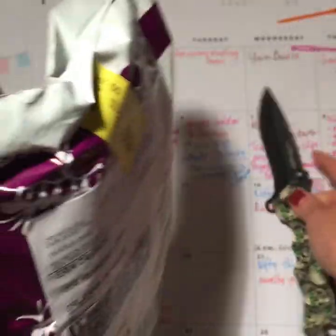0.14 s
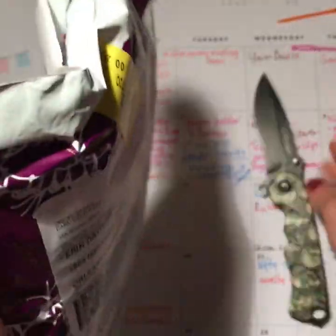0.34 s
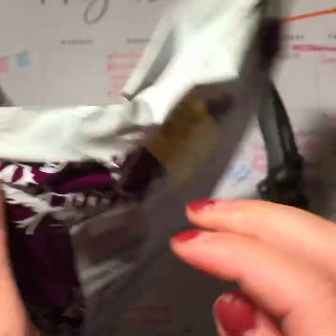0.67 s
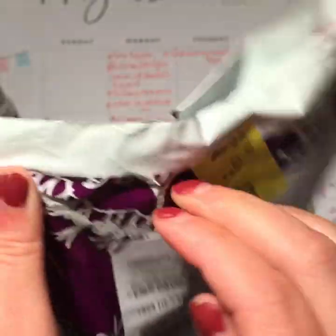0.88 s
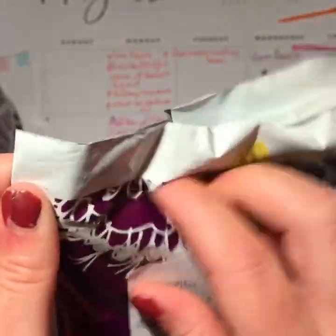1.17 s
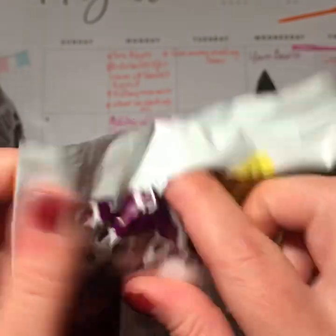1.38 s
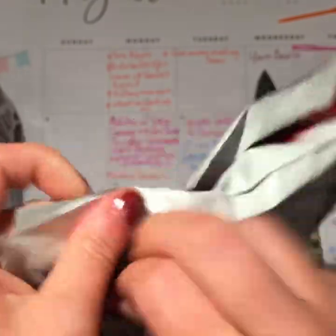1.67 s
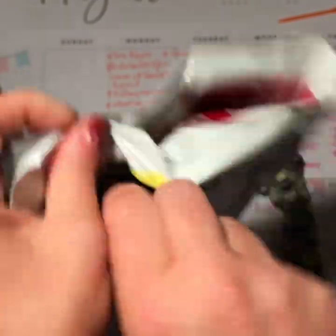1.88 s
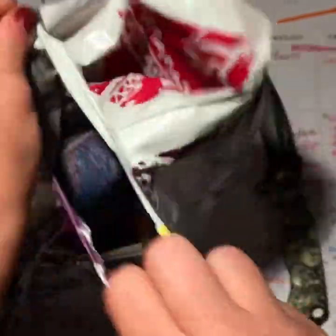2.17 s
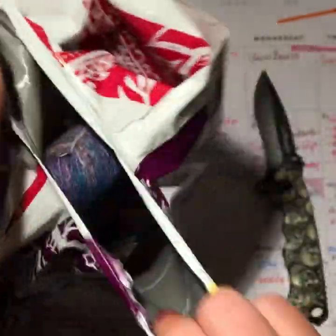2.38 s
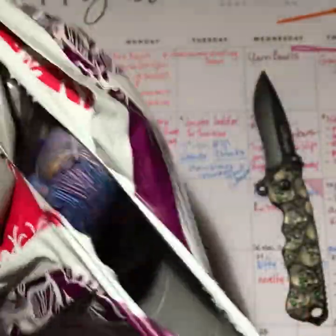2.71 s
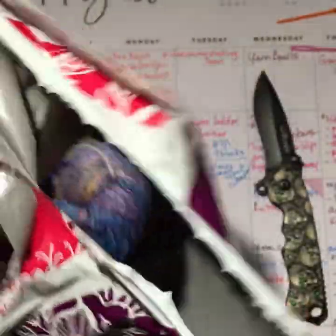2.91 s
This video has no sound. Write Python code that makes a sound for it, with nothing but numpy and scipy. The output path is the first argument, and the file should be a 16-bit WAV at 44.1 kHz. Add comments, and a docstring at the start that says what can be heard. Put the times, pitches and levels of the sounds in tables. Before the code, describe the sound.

Crisp plastic film crackles ever louder as hands open a package, following a knife set down

```python
"""A knife goes down on a table: dull thumps ring the wood's low modes, noise bursts give the handle's clack.
Two hands then crinkle a plastic mailer and pull it open: creases snap as short, smeared rings, pieces of
the sheet flap as hollow noise taps, and slack-drum pops are sagging sines. Swarms of tiny crackles and
flaps and the hiss of sliding film follow the pull of the hands.
Throughout, a small room answers faintly over low hum and a rush of air; the microphone is close."""
import sys
import numpy as np
from scipy import signal
from scipy.fft import rfft, irfft
from scipy.io import wavfile

SR = 44100
rng = np.random.default_rng(int(sys.argv[2]) if len(sys.argv) > 2 else 0)


def digitize_waveform(pressure):
    """Quantize a signal to 16-bit integers and store it at the path in sys.argv[1].

    Rows of a 2-D input are taken as channels; values are limited to [-1, 1].
    """
    field = np.atleast_2d(pressure).T
    bounded = np.clip(field, -1, 1)
    quanta = np.round(bounded * 32767).astype(np.int16)
    wavfile.write(sys.argv[1], SR, quanta)


N = 134505  # length [samples]


def amp(db):
    """Turns decibels into gain."""
    return 10 ** (np.asarray(db) / 20)


def unit(x):
    """Scales a sound to energy 1."""
    return x / np.sqrt(np.sum(x ** 2) + 1e-20)


def evened(x):
    """Scales a sound to rms 1."""
    return unit(x) * np.sqrt(len(x))


def read(points, hz):
    """Reads a curve between its points on a log-frequency axis."""
    f, value = np.transpose(points)
    return np.interp(np.log(hz + 1), np.log(f + 1), value)


def add(mix, s, sound):
    """Mixes a sound in at time s."""
    start = max(round(s * SR), 0)
    part = mix[start:][:len(sound)]
    part += sound[:len(part)]


def bins(size=2048):
    """Frequencies of a short spectrum [Hz]."""
    return np.fft.rfftfreq(size, 1 / SR)


def click(db):
    """The sharpest causal click with this spectrum: minimum phase, energy 1."""
    both_sides_db = np.r_[db, db[-2:0:-1]]
    log_gain = np.log(amp(both_sides_db))
    spectrum = np.exp(np.conj(signal.hilbert(log_gain)))
    return unit(np.fft.ifft(spectrum).real[:len(db)])


def burst(decay_s, size=1500):
    """A puff of noise that dies away, energy 1."""
    fade = np.exp(-np.arange(size) / SR / decay_s)
    return unit(rng.standard_normal(size) * fade)


def noise(points):
    """Steady noise of a given spectrum, rms 1."""
    white = rfft(rng.standard_normal(N))
    return evened(irfft(white * amp(read(points, bins(N))), N))


def swarm(grains, per_s, spread_db):
    """Scatters grains at random times, signs and sizes, rms 1."""
    out = np.zeros(N)
    for grain in grains:
        sign = rng.choice([-1, 1], N)
        boost_db = spread_db * np.minimum(rng.exponential(1, N), 3.2)
        struck = rng.random(N) < per_s / len(grains) / SR
        out += signal.oaconvolve(sign * amp(boost_db) * struck, grain)[:N]
    return evened(out)


# colour of the film in every snap and crackle: (frequency [Hz], level [dB])
FILM_COLOUR = [(150, -18), (500, -9.5), (1500, 7.5), (3000, 6), (6000, 5), (11000, 3.5), (16000, -8.5)]
RATTLE, RATTLE_S = .6, 0.0024  # gain and decay of the film's rattle after a snap
SHIVER, SHIVER_S = 0.43, 0.0031  # gain and decay of the shiver that follows on
SNAP_SKIRT = 1.5  # steepness of the slopes either side of a snap's pitch
BEND_S, BEND_HZ = 0.00044, 4740  # bending waves' travel time at this pitch; low notes come later


def snap(hz, octaves, skirt=SNAP_SKIRT):
    """A crease flips: one short ring spreads through the film, which rattles after it."""
    f = bins() + 1
    away = np.log2(f / hz) / octaves
    ring = click(read(FILM_COLOUR, f) - 10 * skirt * np.log10(1 + away ** 2))
    late = np.exp(-4j * np.pi * BEND_S * np.sqrt(f * BEND_HZ))
    ring = irfft(rfft(ring, 2 * len(f) - 2) * late)[:len(f)]
    drive = RATTLE * burst(RATTLE_S) + SHIVER * burst(SHIVER_S)
    drive[0] += 1  # the flip itself
    return unit(signal.fftconvolve(drive, ring))


# colour of a jerking piece of sheet: (frequency [Hz], level [dB])
SHEET_COLOUR = [(100, -16), (300, -4), (480, -15), (900, -4), (2300, -20), (5000, -28), (16000, -100)]
FLAP_S, FLAP_OCTAVES = 0.0041, 1  # decay of the jerk; width of its pitch peak


def flap(hz):
    """A wider piece of the sheet jerks with a hollow tap of its own pitch."""
    away = np.log2((bins() + 1) / hz) / FLAP_OCTAVES
    tap = click(read(SHEET_COLOUR, bins()) - 10 * np.log10(1 + away ** 2))
    return unit(signal.fftconvolve(burst(FLAP_S), tap))


# creases that buckle: (time [s], energy before SNAP_DB [dB], pitch [Hz], bandwidth [octaves])
CREASE_SNAPS = [(.63, -21, 2220, 0.63), (0.7042, -23.5, 2400, 0.57), (.8093, -25.5, 2900, 0.23),
                (0.9771, -23.5, 4300, 0.21), (.989, -11.5, 6560, 1.1), (1.0116, -14, 6450, 0.19),
                (1.052, -7, 5670, 1.8), (1.071, -14, 4530, 0.54), (1.0768, -13.5, 3500, 0.9),
                (1.1153, -7, 2770, 0.99), (1.1266, -6, 2640, 1.3), (1.22, -11.5, 4900, 4.2),
                (1.3697, -13.5, 5070, 0.62), (1.458, -13, 3920, 0.72), (1.5923, -4, 4600, 0.66),
                (1.6139, -2.5, 4800, 0.67), (1.6585, -7, 3900, 0.46), (1.6857, -8, 5200, .66),
                (1.699, -7.5, 6600, 0.31), (1.7224, -10.5, 3160, 0.14), (1.73, 1.5, 7250, 0.39),
                (1.7782, -4.5, 6640, .28), (1.8152, -1, 5740, 0.097), (1.8374, -7, 5500, 0.55),
                (1.852, -2, 5100, 1.2), (1.885, -11, 8060, 0.5), (1.8907, -0.5, 11900, 2.2),
                (1.9029, -5, 3180, 0.47), (1.9763, -8, 4450, .5), (2.0114, -6.5, 4220, 1),
                (2.0539, -1.5, 6600, 0.43), (2.078, -2.5, 5360, 2.1), (2.108, -2, 5470, 0.98),
                (2.1295, -4, 3300, .3), (2.1448, -2.5, 8300, 1.2), (2.1971, -1.5, 3960, 3.2),
                (2.2028, -2, 5600, 6.6), (2.212, -3, 5930, 1.1), (2.2324, -3, 5960, 0.71),
                (2.2374, 1.5, 3350, 1.5), (2.315, -3, 4700, 1.4), (2.3355, -7.5, 3060, .3),
                (2.3452, -6, 2650, 0.33), (2.358, 2, 3880, 1.8), (2.4148, 0, 3480, 1.4),
                (2.439, 1, 5430, 1.3), (2.4464, -11, 4200, 1.4), (2.471, -3.5, 4360, 2.6),
                (2.4794, -4, 5840, 3.8), (2.5148, 0, 3330, 0.75), (2.5372, -8, 3800, 1),
                (2.5988, -10.5, 3160, 1.6), (2.6255, -11.5, 4700, 0.43), (2.6391, -9, 2600, .4),
                (2.6847, -14, 3360, 0.64), (2.697, 5.5, 5630, 0.49), (2.7143, 2.5, 4480, 1.1),
                (2.718, 3.5, 9000, 2), (2.7739, -2, 3400, 2.3), (2.781, -4, 2900, 0.84),
                (2.834, -7, 5650, 0.36), (2.8491, -12, 5600, 1.6), (2.8707, -6.5, 6200, 1.2),
                (2.924, -5.5, 3200, 0.62)]
# jerks of the sheet: (time [s], energy before FLAP_DB [dB], pitch [Hz])
SHEET_FLAPS = [(.06, -25, 1010), (0.088, -21.5, 760), (.78, -17, 1030), (0.9622, -26, 1250),
               (0.9758, -11.5, 940), (1.323, -19, 1300), (1.686, -29, 1050), (1.84, -5, 980),
               (1.975, -4, 1000), (2.081, -4.5, 1380), (2.107, -3, 1110), (2.1564, -12, 1110),
               (2.232, -2, 1170), (2.36, -5, 1620), (2.4167, -12, 1580), (2.439, 2.5, 1120),
               (2.4803, -2, 1350), (2.4897, -24, 1350), (2.717, -4, 1100), (2.7743, -8.5, 1650),
               (2.833, -7, 1020), (2.8491, -7.5, 1280)]
# the taut bag pops like a slack drum: (time [s], energy [dB], middle pitch [Hz])
BAG_POPS = [(2.237, -14, 296), (2.359, -10, 290), (2.713, -12, 266), (2.776, -9, 346)]
SNAP_DB, FLAP_DB = -0.5, -4  # trims of all snaps and flaps
POP_DECAY_S, POP_SAG = 0.0042, 0.11  # fade of a pop; fall of its pitch as a share of it


def creases():
    """Loud snaps of buckling film, flaps of the sheet and hollow pops whose pitch sags as they fade."""
    out = np.zeros(N)
    for s, db, hz, octaves in CREASE_SNAPS:
        add(out, s - BEND_S, amp(db + SNAP_DB) * snap(hz, octaves))
    for s, db, hz in SHEET_FLAPS:
        add(out, s, amp(db + FLAP_DB) * flap(hz))
    fade = np.exp(-np.arange(SR // 10) / SR / POP_DECAY_S)
    for s, db, hz in BAG_POPS:
        sagging_hz = hz * (1 + POP_SAG * (fade - .5))
        pop = fade * np.sin(2 * np.pi * np.cumsum(sagging_hz) / SR)
        add(out, s, amp(db) * unit(pop))
    return out


# pull of the hands, from which each layer is trimmed: (time [s], level [dB])
HAND_PULL = [(0, -64.5), (.3, -63.5), (.56, -63), (.77, -54.5), (.87, -56.5), (.93, -81), (.965, -60.5),
             (1.08, -45), (1.19, -53), (1.48, -51.5), (1.528, -43.5), (1.63, -50.5), (1.732, -39.5),
             (1.8, -50.5), (1.92, -46.5), (1.98, -39), (2.039, -51), (2.09, -36), (2.22, -34),
             (2.27, -41.5), (2.35, -38), (2.57, -43), (2.8, -42), (3.05, -46)]
# colour of film sliding on film, here and in the rubs: (frequency [Hz], level [dB per Hz])
SLIDE_COLOUR = [(300, 4.5), (1200, -4), (6500, 2.5), (9000, 1), (16000, -14.5)]
CRACKLE_DB, SLIDE_DB, FLUTTER_DB = -0.5, -12, -3  # layer trims
CRACKLE_HZ, CRACKLE_SKIRT = (1430, 7700), 3  # pitch range; steepness of the slopes
CRACKLES_PER_S, CRACKLE_SPREAD_DB = 420, 6
FLAP_HZ = (630, 1660)  # each small flap of the flutter favours its own pitch in this range
FLAPS_PER_S, FLAP_SPREAD_DB = 200, 5
PULL_DB, FLUTTER_FOLLOW = -19, 0.97  # flutter moves 0.97 dB per dB of pull, pivoting at this level
AVALANCHE_DB, AVALANCHE_S = -35, 0.0059  # crackle swell around a flap: trim, rise and fall time


def crinkle(count=30):
    """Crackles, flutter and sliding hiss follow the hands; each jerk swells the crackles around it."""
    t = np.arange(N) / SR
    pull_db = np.interp(t, *np.transpose(HAND_PULL))
    avalanche = np.zeros(N)
    for s, flap_db, _ in SHEET_FLAPS:
        avalanche += amp(AVALANCHE_DB) * amp(flap_db) * np.exp(-abs(t - s) / AVALANCHE_S)

    tiny_snaps = [snap(hz, octaves=0.84, skirt=CRACKLE_SKIRT) for hz in np.geomspace(*CRACKLE_HZ, count)]
    crackles = swarm(tiny_snaps, CRACKLES_PER_S, CRACKLE_SPREAD_DB)
    small_flaps = [flap(hz) for hz in np.geomspace(*FLAP_HZ, count)]
    flutter = swarm(small_flaps, FLAPS_PER_S, FLAP_SPREAD_DB)

    crackle_level = amp(pull_db + CRACKLE_DB) + avalanche
    slide_level = amp(pull_db + SLIDE_DB)
    flutter_level = amp(PULL_DB + FLUTTER_FOLLOW * (pull_db - PULL_DB) + FLUTTER_DB)
    return crackle_level * crackles + slide_level * noise(SLIDE_COLOUR) + flutter_level * flutter


# film slips on film: (time [s], length [s], peak level [dB])
FILM_RUBS = [(0.204, 0.44, -62), (0.568, 0.18, -55), (1.216, 0.085, -41), (1.357, 0.088, -42.5),
             (1.465, 0.12, -47.5), (2.917, 0.081, -66)]


def rubs():
    """Film slips on film: dense tiny clicks make a grainy hiss in short swells."""
    t = np.arange(N) / SR
    level = np.zeros(N)
    for s, length, db in FILM_RUBS:
        level += amp(db) * np.sin(np.pi * np.clip((t - s) / length, 0, 1))
    return level * swarm([click(read(SLIDE_COLOUR, bins()))], per_s=2200, spread_db=3)


# the knife handle touches down: (time [s], energy [dB], decay [s])
HANDLE_CLACKS = [(.23, -8, 0.0092), (.441, -10.5, .012)]
# colour of the handle: (frequency [Hz], level [dB])
HANDLE_COLOUR = [(200, -9), (620, 6), (870, 2), (1150, -9), (3000, -2), (16000, -26.5)]


def knife():
    """The handle clacks on the table: fading noise coloured by the handle's resonances."""
    out = np.zeros(N)
    for s, db, decay_s in HANDLE_CLACKS:
        body = click(read(HANDLE_COLOUR, bins()))
        clack = signal.fftconvolve(burst(decay_s, size=4000), body)
        add(out, s, amp(db) * unit(clack))
    return out


# blows on the table: (time [s], strength [dB], contact time [s])
TABLE_THUMPS = [(.155, -32.5, 0.00058), (.206, -23, 0.0008), (.232, -22.5, 0.00017), (.239, -12.5, 0.0025),
                (0.441, -18, 0.00051), (0.4493, -11, 0.0018), (.476, -11.5, 0.0028), (0.51, -7, 0.006),
                (.535, -22, 0.0034)]
# low modes of the table top: (frequency [Hz], level [dB], time to fall 60 dB [s])
TABLE_MODES = [(63.3, -14, 0.48), (89.8, -8, 0.35), (109.6, -8.5, 0.23), (134, 4, 0.138), (218.3, -9, 0.18),
               (283.8, 1, 0.081)]


def table():
    """Blows ring the low modes of the table; the softer the contact, the deeper the thump."""
    t, out = np.arange(SR // 2) / SR, np.zeros(N)
    ring = sum(amp(db - 60 * t / t60) * np.sin(2 * np.pi * hz * t) for hz, db, t60 in TABLE_MODES)
    for s, db, contact_s in TABLE_THUMPS:
        push = t * np.exp(-t / contact_s)
        add(out, s, amp(db) * signal.fftconvolve(push / push.sum(), ring))
    return out


# time the room takes to fall 60 dB: (frequency [Hz], time [s])
ROOM_FALL = [(100, 0.63), (5000, 0.47), (16000, 0.13)]
ROOM_DB, EARLY_DB, EARLY_S = -24, -13.5, 0.0061  # tail energy; energy and decay of the reflections


def room(x, size=256):
    """Quick reflections from the table, then a faint tail that is shorter in the treble."""
    hz, t, z = signal.stft(rng.standard_normal(SR // 2), SR, nperseg=size)
    fading = z * amp(-60 * t / read(ROOM_FALL, hz)[:, None])
    tail = amp(ROOM_DB) * unit(signal.istft(fading, SR, nperseg=size)[1])
    add(tail, 0, amp(EARLY_DB) * burst(EARLY_S))
    out = np.zeros(N)
    add(out, .002, signal.fftconvolve(x, tail))
    return out


# mains hum partials: (frequency [Hz], rms level [dB])
HUM_PARTIALS = [(59.8, -57.5), (120, -51.5)]
# colour of the room air: (frequency [Hz], level [dB per Hz])
AIR_COLOUR = [(20, -4), (68, 0.5), (180, -11), (600, -24.5), (2000, -48), (4500, -35), (9000, -41),
              (16000, -57)]
AIR_DB = -48.5  # rms level of the air


def background():
    """Mains hum as steady sines, and the low rush of room air as shaped noise."""
    t = np.arange(N) / SR
    hum = np.zeros(N)
    for hz, db in HUM_PARTIALS:
        hum += amp(db) * np.sqrt(2) * np.sin(2 * np.pi * (hz * t + rng.random()))
    return hum + amp(AIR_DB) * noise(AIR_COLOUR)


def scene():
    """Bag, knife and table in the room, over its hum and air."""
    near = creases() + crinkle() + rubs() + table() + knife()
    return (near + room(near) + background())[None]


LOW_CUT_HZ, EDGE_HZ = 46, 16300


def record(dry):
    """The recorder's low cut and band limit."""
    low_cut = signal.butter(5, LOW_CUT_HZ, "high", fs=SR, output="sos")
    thin = signal.sosfilt(low_cut, dry)
    band_limit = signal.firwin(255, EDGE_HZ, window=("kaiser", 9), fs=SR)
    return signal.oaconvolve(thin, band_limit[None], "same")


dry = scene()
out = record(dry)
digitize_waveform(out)
```